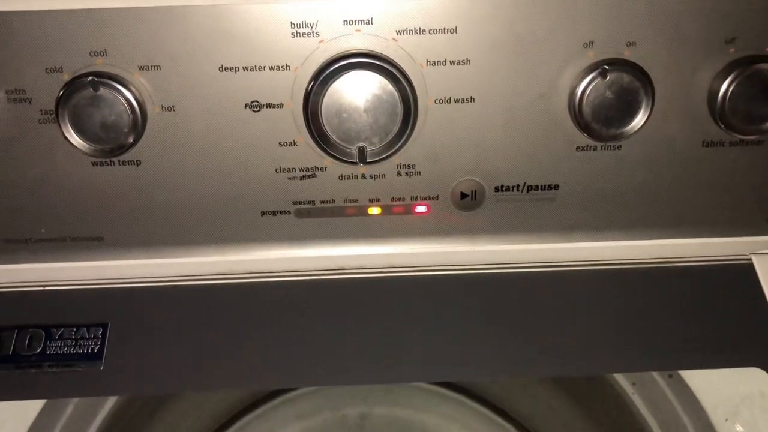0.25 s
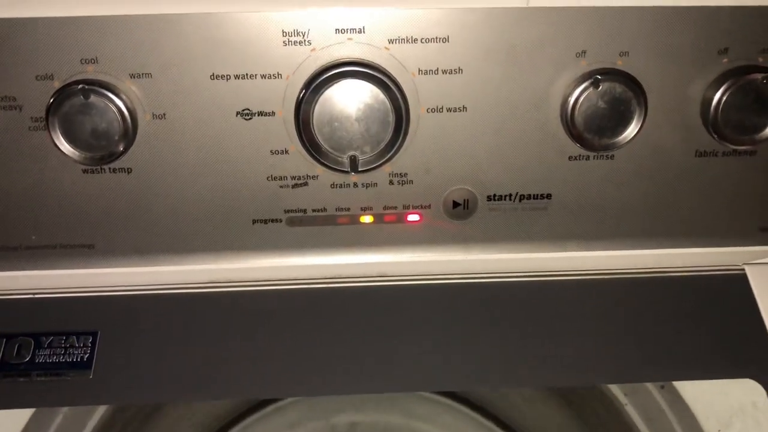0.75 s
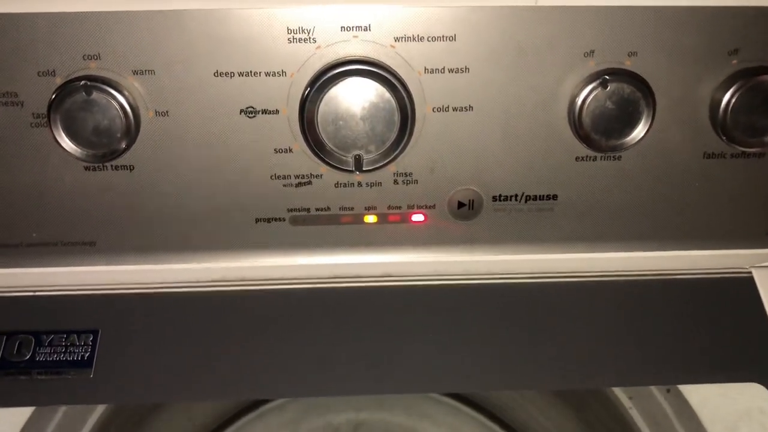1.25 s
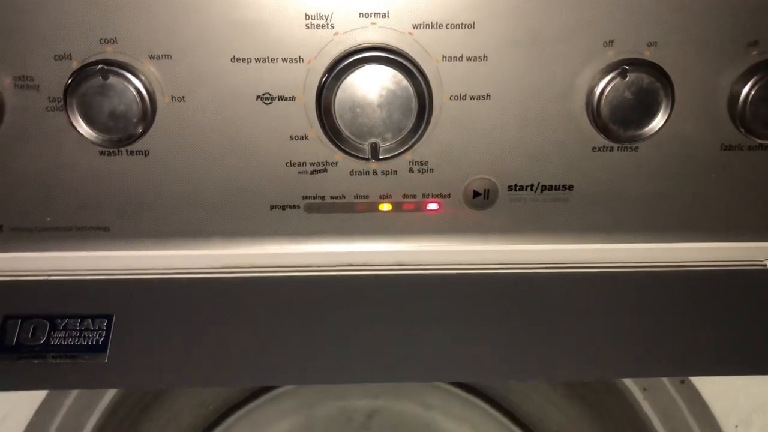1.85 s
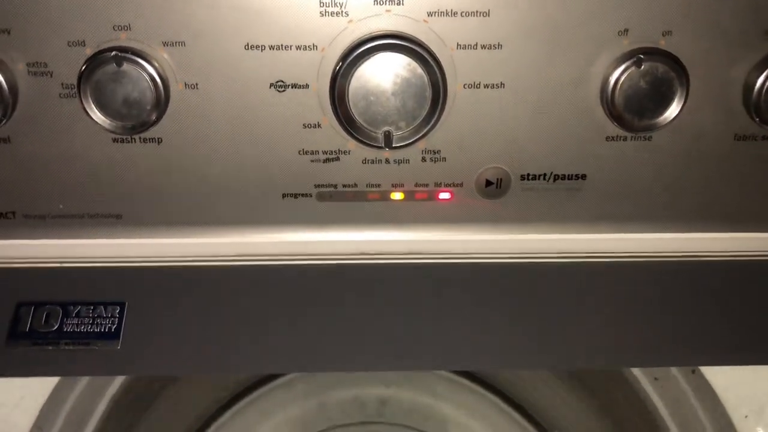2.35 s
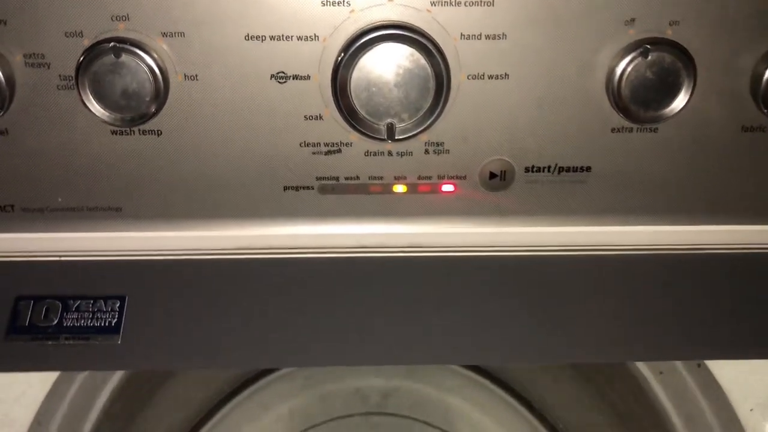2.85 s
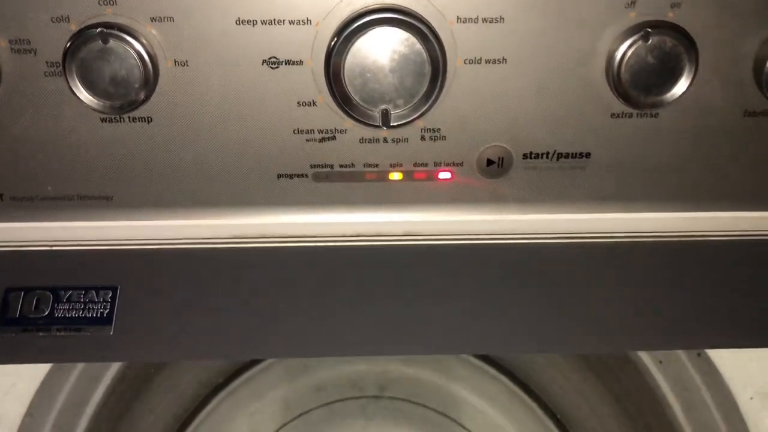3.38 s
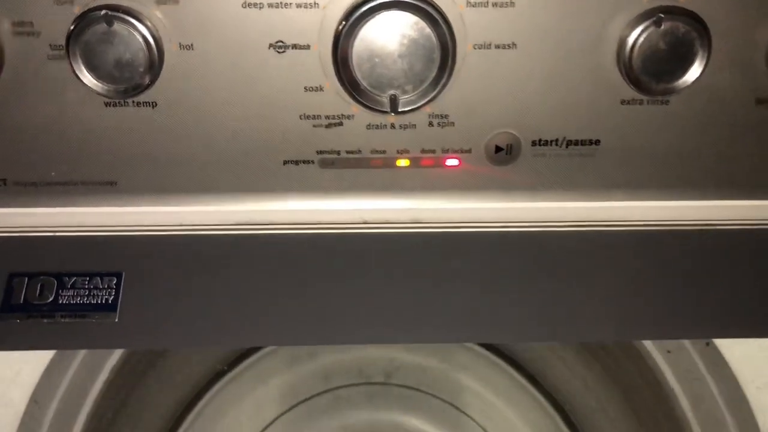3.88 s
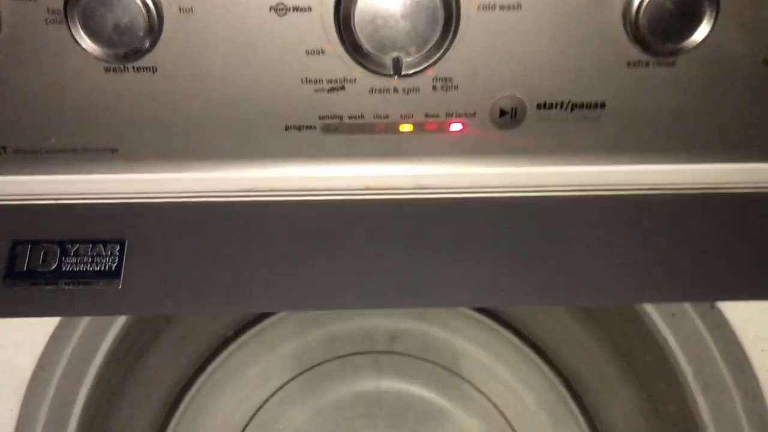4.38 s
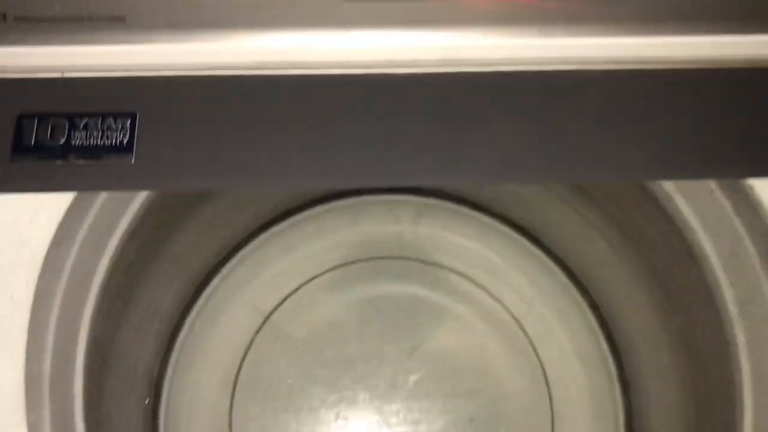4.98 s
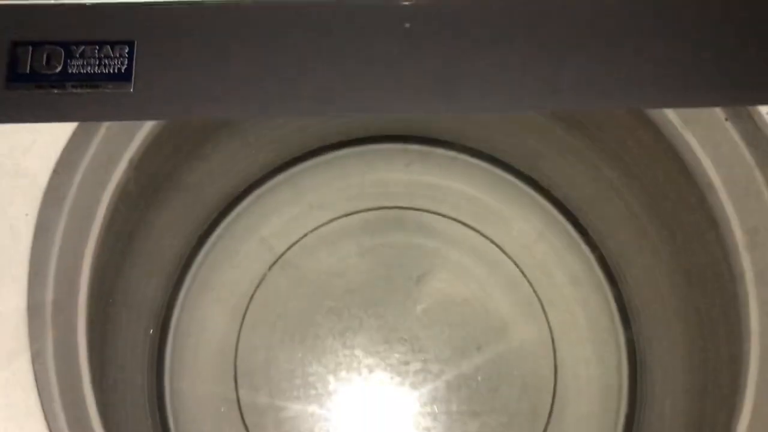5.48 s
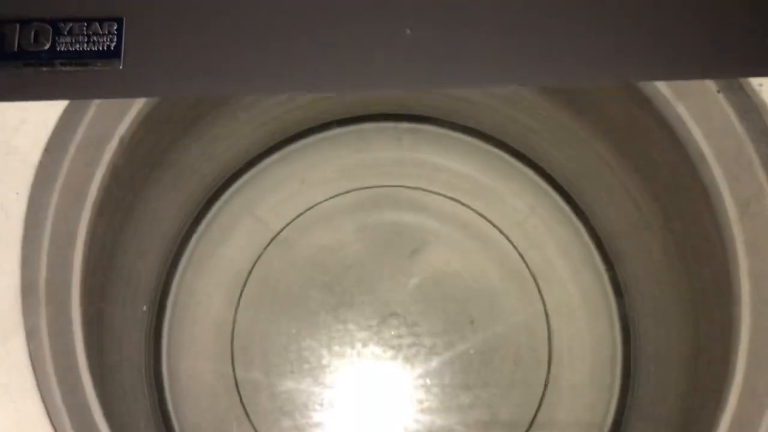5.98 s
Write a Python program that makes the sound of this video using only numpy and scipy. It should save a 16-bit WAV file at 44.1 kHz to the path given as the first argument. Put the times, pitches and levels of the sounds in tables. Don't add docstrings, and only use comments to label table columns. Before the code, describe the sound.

A top-load washer spins its empty basket, heard close above the lid in mono, already running at the start and still running at the end, about 6.2 seconds. From 0 to 1 s it speeds up slightly: low mains hum wavers about eight times a second, a mid-pitched whine climbs a little, a fine high chirr sounds, and ringing metallic ticks strike twice per turn. Around 1 s the tub calms; the chirr fades and each main tick, some eight per second, gains a light graze just before it. The whine weakens near 2.3 s and partly recovers by 4 s. The second ticks strengthen near 2.2 s, a small dry snap falls at 2.4 s, and they fade after 3 s. A faint stray tick comes at 5.2 s, and weak second ticks return near 5.3 s, then vanish. Boxy rumble, low drone and soft air rush continue throughout.

```python
import sys
import numpy as np
from scipy import signal
from scipy.fft import rfft, irfft, next_fast_len
from scipy.io import wavfile
from scipy.ndimage import uniform_filter1d, map_coordinates

SR = 44100
rng = np.random.default_rng(int(sys.argv[2]) if len(sys.argv) > 2 else 0)


def makeup_ratio(level_db):
    decades = np.asarray(level_db, float) / 20
    return 10 ** decades


def generate_wav(signal):
    frames = np.transpose(np.atleast_2d(signal))
    scaled = np.clip(frames, -1, 1) * 32767
    pcm = np.round(scaled).astype(np.int16)
    wavfile.write(sys.argv[1], SR, pcm)


N = 274743
TIME_S = np.arange(N) / SR
HUM_HZ = 120


def unit(x):
    return x / np.sqrt(np.mean(x ** 2) + 1e-20)


def curves(rows):
    s, *columns = np.transpose(rows)
    return [np.interp(TIME_S, s, column) for column in columns]


def surges(rows):
    return sum(db * np.exp(-((TIME_S - s) / spread) ** 2) for s, spread, db in rows)


def wobble(rate_hz):
    knots = rng.standard_normal(int(N * rate_hz / SR) + 4)
    return map_coordinates(knots, [np.arange(N) * rate_hz / SR])


def angle(hz):
    return 2 * np.pi * np.cumsum(hz + np.zeros(N)) / SR


def tone(phase, db, waver_db):
    return np.sqrt(2) * makeup_ratio(db + waver_db * wobble(3.02)) * np.sin(phase)


def filtered(x, response):
    size = next_fast_len(N + 8192)
    return irfft(rfft(x, size) * response(np.fft.rfftfreq(size, 1 / SR)), size)[:N]


def modes(table):
    def response(f):
        total = 0
        for k, (centre, width, db) in enumerate(table):
            damping = 1j * f * width
            total = total + (-1) ** k * makeup_ratio(db) * damping / (centre * centre - f * f + damping)
        return total
    return response


def settled():
    settles_s, spread_s = 1.0, .25
    return 1 / (1 + np.exp((settles_s - TIME_S) / spread_s))


# time_s, strength_db, lean_db (third line over second)
HUM = [(0, -34.5, -1), (.35, -33.5, -3.5), (.62, -34.5, -12), (.78, -36, 1), (1.05, -34, 10), (1.3, -35, 2),
       (1.5, -35, 2), (2.1, -37.5, -9.5), (2.4, -37, -5.5), (3.5, -36, -7), (3.85, -37, -0.5),
       (4.2, -36.5, -1), (4.9, -36, -0.5), (5.25, -34.5, .6), (5.45, -35.6, 3.5), (5.95, -35.5, -1),
       (6.23, -35, -1.5)]
# hum_multiple, level_db, waver_db
BUZZ = [(4, -54, -2), (5, -55.5, 4.5), (6, -52.5, 0.6), (7, -52.5, 1.5), (8, -70, 6)]
# hum_multiple, turns_added, loose_db, settled_db, lag_turns
SIDES = [(1, 1, -44.5, -56, .56), (1, 2, -57, -60, .56), (1, 3, -59, -68, .3), (1, -1, -58, -65, .56),
         (2, -1, -50, -54, .22), (2, 1, -59, -54, .5), (2, 2, -59, -63, .3), (3, -2, -57, -53, .7),
         (3, -1, -62, -53, .7), (3, 1, -58, -57, .3), (3, 2, -59, -66, .4), (5, -1, -55, -58, .4),
         (6, 1, -66, -62, .4)]
# time_s, lost_hz (at the hum frequency)
DRIVE_LAG = [(0, .02), (.4, .06), (.8, .4), (1.8, .17), (2.2, 0), (3.6, -.04), (4.2, 0), (5.3, 0),
             (5.6, .08), (6.23, .03)]
# time_s, suspension_sway_turns_per_s, tub_rocking_turns_per_s
SPEEDS = [(0, 8.0, 7.85), (.75, 8.0, 8.27), (1.1, 8.04, 8.4), (1.7, 8.05, 8.35), (2.1, 8.0, 8.0),
          (2.7, 8.05, 8.0), (3.2, 8.2, 8.1), (3.8, 8.35, 8.18), (5.2, 8.3, 8.32), (6.23, 8.35, 8.37)]
# pitch_hz, level_db
ROTOR = (57.5, -55)
# centre_s, spread_s, change_db
ROTOR_DIPS = [
    (0, .35, -12),
    (1.25, 0.11, -14),
    (1.7, 0.21, -7),
    (2.7, .15, -14),
    (6, 0.36, -5),
]


def motor():
    hum_db, lean_db = curves(HUM)
    mains, drive = angle(HUM_HZ), angle(HUM_HZ - curves(DRIVE_LAG)[0])

    def line(k, split=3):
        return k * (mains if k < split else drive) + .9 * k * k

    second_db = hum_db - 10 * np.log10(1 + makeup_ratio(2 * lean_db))
    third_db = hum_db - 10 * np.log10(1 + makeup_ratio(-2 * lean_db))
    out = np.zeros(N)
    for k, db in [(1, -40), (2, second_db), (3, third_db)]:
        out += tone(line(k), db, waver_db=-0.52)
    for k, db, waver_db in BUZZ:
        out += tone(line(k), db, waver_db)
    out += tone(3 * mains / 2, -55.0, waver_db=-0.5)
    sway, calm = angle(curves(SPEEDS)[0]), settled()
    for k, turns, loose_db, settled_db, lag_turns in SIDES:
        db = -1.9 + loose_db + calm * (settled_db - loose_db)
        out += tone(line(k, split=2.2) + turns * (sway - 2 * np.pi * lag_turns), db, waver_db=0.9)
    rotor_hz, rotor_db = ROTOR
    return out + tone(angle(rotor_hz + 0.2 * wobble(0.97)), rotor_db + surges(ROTOR_DIPS), waver_db=1.2)


# time_s, level_db
SLOT = [(0, -51), (.6, -48.5), (1.05, -52.5), (2.3, -63), (2.9, -61.5), (4.2, -55.5), (5, -56), (5.6, -57),
        (6.23, -53.5)]
# hum_multiples_added, basket_turns_added, level_db
SLOT_SIDES = [(0, 0, 0), (1, 0, -1.5), (2, 0, -5.5), (3, 0, -3), (0, -1, -11.5), (1, -1, -10), (3, -1, -6)]
# centre_hz, spread_hz, lift_db
FRAME = [(516, 12, 5), (620, 12, 7), (882, 14, 4)]
# time_s, turns_per_s
BASKET = [(0, 7.924), (.5, 8.213), (1, 8.426), (1.5, 8.485), (2.3, 8.461), (3.3, 8.376), (4.5, 8.36),
          (6.23, 8.381)]
SLOTS = 62.7


def whine():
    level_db, loose = curves(SLOT)[0], 1 - settled()
    slot_hz = SLOTS * curves(BASKET)[0] + 0.748 * wobble(6)
    out = np.zeros(N)
    for hums, turns, rel_db in SLOT_SIDES:
        hz = slot_hz * (1 + turns / SLOTS) + hums * HUM_HZ
        lift_db = sum(lift * np.exp(-((hz - centre) / spread) ** 2) for centre, spread, lift in FRAME)
        loose_db = -9 * abs(turns) * loose
        phase = angle(hz) + rng.uniform(0, 2 * np.pi)
        out += tone(phase, level_db + rel_db + lift_db + loose_db, waver_db=1.5)
    return out


# centre_s, spread_s, change_db
NINTH_SURGES = [
    (.6, 0.55, 10.5),
    (2.2, .3, 7.9),
    (3.15, 0.57, 10.5),
    (4.7, .3, 4),
]
# centre_s, spread_s, change_db
OTHERS_SURGES = [
    (1.4, 0.55, -1),
    (2.9, 0.3, 3.5),
    (3.8, 0.45, 4.5),
]
# tub_order, level_db
ORDERS = [(5, -13), (8, -4), (10, 0.5), (11, 0.5), (13, -3), (15, -2.5), (16, -18), (17, 2.5), (19, 0.5),
          (21, 3), (27, 0.5), (34, -12), (35, -11), (37, -10), (39, -3.5)]


def tub():
    turn = angle(curves(SPEEDS)[1])
    out = tone(9 * turn, -60.5 + surges(NINTH_SURGES), waver_db=1.5)
    others_db = -64.5 + 1.17 * TIME_S + surges(OTHERS_SURGES)
    for order, db in ORDERS:
        out += tone(order * turn + rng.uniform(0, 2 * np.pi), others_db + db, waver_db=2.0)
    return out


def rush(points, patchy_db):
    z = signal.stft(rng.standard_normal(N), nperseg=1024)[2]
    field = uniform_filter1d(rng.standard_normal(z.shape), 6, 0)
    field = uniform_filter1d(field, 6, 1)
    x = signal.istft(z * makeup_ratio(patchy_db * unit(field)), nperseg=1024)[1][:N]
    f, db = np.transpose(points)
    return unit(filtered(x, lambda hz: makeup_ratio(np.interp(np.log(hz + 1), np.log(f), db))))


# freq_hz, density_db
CABINET = [(30, -29), (60, -15), (100, -7), (135, 1.5), (160, -9.5), (197, -4), (222, 7.5), (252, 2),
           (320, 2), (420, -3), (620, -2.5), (800, -12), (1100, -14), (1500, -48.5)]
# freq_hz, density_db
AIR = [(530, -27), (900, 1), (948, -4), (1270, -8), (2190, -13), (2910, -26), (3300, -22.5), (4520, -27),
       (6520, -29), (8290, -31), (11000, -39), (14300, -68), (22000, -120)]
# freq_hz, density_db
HISS = [(6470, -30), (11000, 1), (13200, 0), (15600, -9)]


def cabinet():
    hum_db = curves(HUM)[0]
    box_db = -42 + 0.39 * (hum_db - hum_db.mean())
    box = makeup_ratio(box_db) * rush(CABINET, patchy_db=0.7)
    air = makeup_ratio(-50.5 + 0.25 * wobble(8)) * rush(AIR, patchy_db=1.5)
    hiss = makeup_ratio(-79.5) * rush(HISS, patchy_db=5.0)
    chirr_db = -71 - 22 * np.sqrt(settled()) + 3.6 * wobble(60)
    chirr = makeup_ratio(chirr_db) * unit(filtered(rng.standard_normal(N), modes([(7300, 140, 0)])))
    return box + air + hiss + chirr


# peak_db, panel_knock_db, bright_rattle_db, middle_db
MAIN_TICK = (-41.5, -4.5, -15.5, -22.5)
# peak_db, knock_db, rattle_db, middle_db
LOOSE_TICK = (-2.6, 0.84, 2.2, 3)
# time_s, peak_db
SECOND = [(0, -41), (.9, -44), (1.12, -47.5), (1.85, -48.5), (2.07, -49), (2.18, -41), (2.45, -45),
          (2.8, -50), (3.1, -64), (5.1, -56), (5.3, -51), (5.76, -57), (6, -66), (6.23, -66)]
# knock_db, rattle_db, middle_db
SECOND_TICK = (-3.5, -20.5, -13)
# peak_db, knock_db, rattle_db, middle_db
GRAZE = (-12.5, 0, 2, 6)
# peak_db, knock_db, rattle_db, middle_db
SCATTER = (.4, .8, .6, .8)
# time_s, peak_db, knock_db, rattle_db, middle_db
STRAY = [
    (5.1687, -54.5, -9, -21, 2),
]


def contacts():
    first_turn, second_lead_turns, graze_lead_s, jitter_s = .617, .415, .0095, .00025
    turns = angle(curves(BASKET)[0]) / (2 * np.pi) - first_turn
    whole = np.arange(int(turns[-1]) + 1)
    main_s = np.interp(whole, turns, TIME_S)
    second_s = np.interp(whole - second_lead_turns, turns, TIME_S)
    calm = np.interp(main_s, TIME_S, settled())[:, None]
    main = np.column_stack([main_s, MAIN_TICK + (1 - calm) * LOOSE_TICK])
    second_db = np.interp(second_s, *np.transpose(SECOND))
    second = np.column_stack([second_s, second_db, np.tile(SECOND_TICK, (len(whole), 1))])
    graze = main + [-graze_lead_s, *GRAZE]
    graze[:, 1] += 20 * np.log10(calm[:, 0])
    rows = np.vstack([main, second, graze])
    rows = rows + rng.standard_normal(rows.shape) * [jitter_s, *SCATTER]
    return np.vstack([rows, STRAY])


def bursts(times_s, levels_db, rise_s, t60_s, blow, alike=.8):
    size = 4000
    out, t = np.zeros(N + size), np.arange(size) / SR
    shape = (1 - np.exp(-t / rise_s)) * makeup_ratio(-60 * t / t60_s)

    def spike(at_s):
        return np.exp(-((t - at_s) / .00004) ** 2)

    blows = blow * (spike(0.001249) + .6 * spike(.0048))
    habit = rng.standard_normal(size)
    for s, db in zip(times_s, levels_db):
        noise, swell = rng.standard_normal((2, size))
        chatter = shape * (alike * habit + np.sqrt(1 - alike ** 2) * noise) * makeup_ratio(2.4 * swell)
        chatter *= np.linalg.norm(shape) / np.linalg.norm(chatter)
        start = max(round((s - .001) * SR), 0)
        out[start:][:size] += makeup_ratio(db) * (chatter + blows)
    return out[:N]


# centre_hz, width_hz, level_db
PANEL = [(1836, 100, 0), (2406, 210, -5.5), (2100, 89, -9)]
SHELL = [(3200, 100, 0), (3410, 80, -1), (3890, 110, -5), (4300, 170, -2), (4740, 130, -11),
         (2650, 200, -9), (4200, 2500, -18)]
CLIP_RING = [(5370, 580, -1), (6270, 670, -3.5)]
RATTLE = [(6900, 300, -3), (7300, 250, -1.5), (8100, 300, 0), (8500, 150, -1), (9300, 500, -7),
          (10600, 1500, -17), (13000, 1500, -16)]
# centre_hz, width_hz, level_db
LID = [(1835, 75, -1), (7250, 82, -17), (11000, 3500, -33)]
# time_s, peak_db
SNAPS = [
    (2.3858, -46),
    (2.388, -45),
    (2.3915, -55),
]


def ticks():
    s, db, knock, bright, middle = contacts().T
    loose_db = 20 * np.log10(1 - np.interp(s, TIME_S, settled()))
    out = filtered(bursts(s, db + knock + 18, rise_s=0.0031, t60_s=0.071, blow=1.44), modes(PANEL))
    out += filtered(bursts(s, db + 4.5, rise_s=0.003, t60_s=0.096, blow=5.0), modes(SHELL))
    out += filtered(bursts(s, db + middle + 12.5, rise_s=0.0027, t60_s=0.13, blow=1.4), modes(CLIP_RING))
    out += filtered(bursts(s, db + bright + 14.0, rise_s=0.00092, t60_s=.12, blow=2.1), modes(RATTLE))
    out += filtered(bursts(s, db + knock + loose_db + 20.5, rise_s=0.0017, t60_s=0.071, blow=2.1), modes(LID))
    snap_s, snap_db = np.transpose(SNAPS)
    snap = bursts(snap_s, snap_db + 8, rise_s=.0003, t60_s=.007, blow=0, alike=0)
    return out + filtered(snap, lambda f: modes([(14000, 6000, 0)])(f) ** 2)


def scene():
    return (motor() + whine() + tub() + cabinet() + ticks())[None]


def roll_off(x):
    return signal.sosfilt(signal.butter(12, 15760, fs=SR, output="sos"), x)


def record(dry):
    top_hz = 15770
    kept = filtered(dry[0], lambda hz: hz < top_hz)
    return roll_off(kept[None])


dry = scene()
out = record(dry)
generate_wav(out)
```